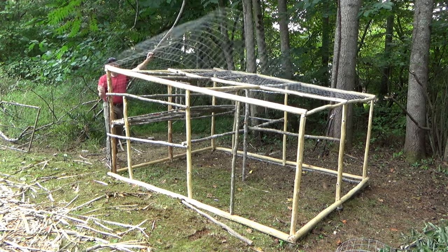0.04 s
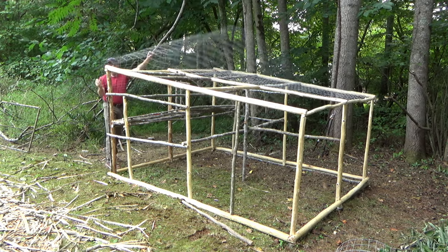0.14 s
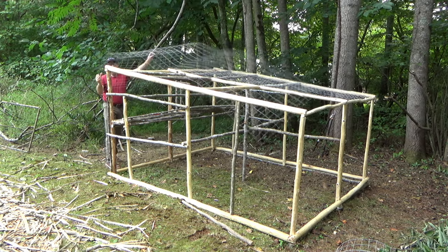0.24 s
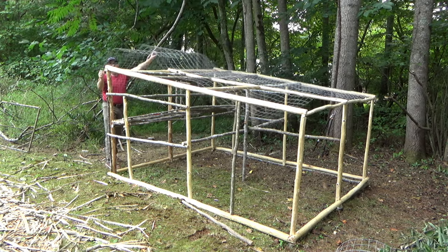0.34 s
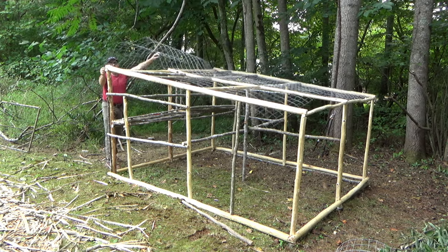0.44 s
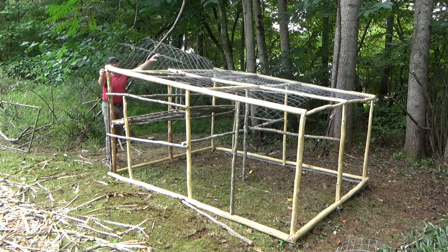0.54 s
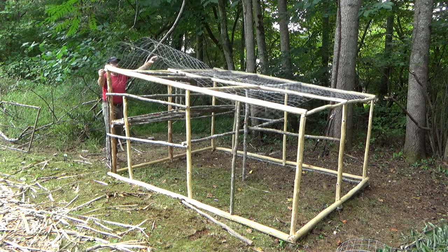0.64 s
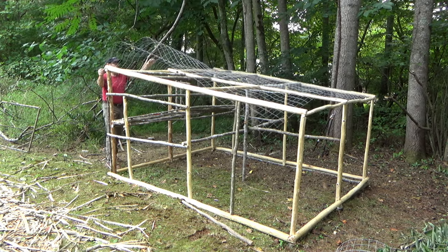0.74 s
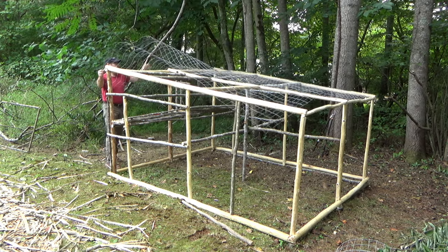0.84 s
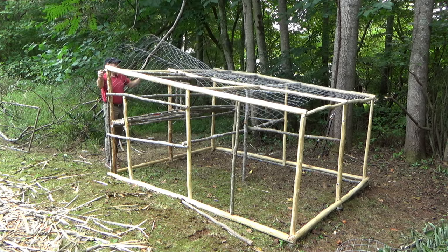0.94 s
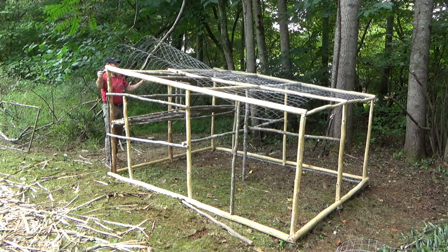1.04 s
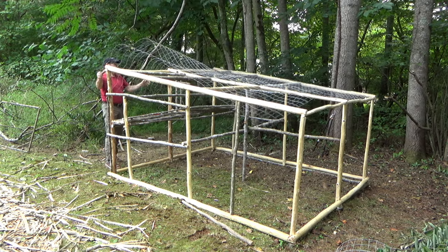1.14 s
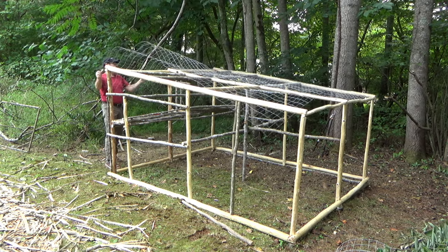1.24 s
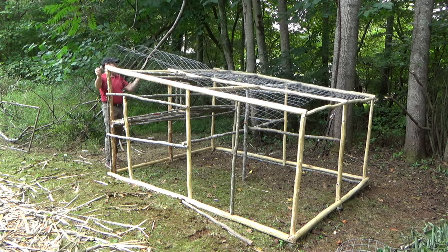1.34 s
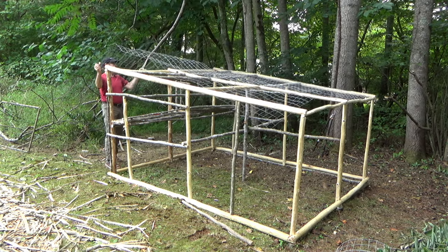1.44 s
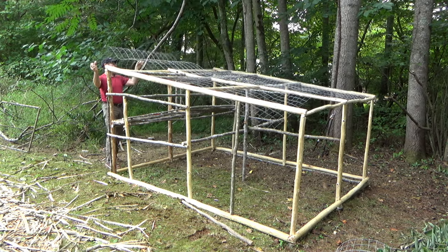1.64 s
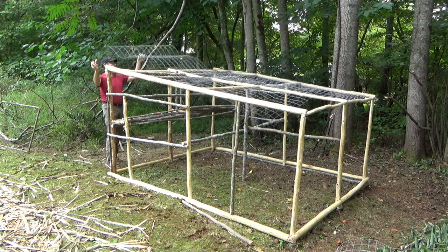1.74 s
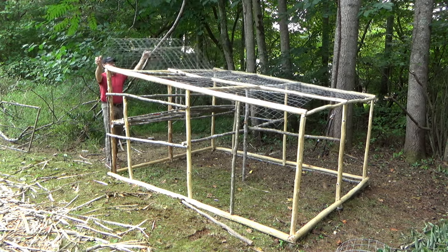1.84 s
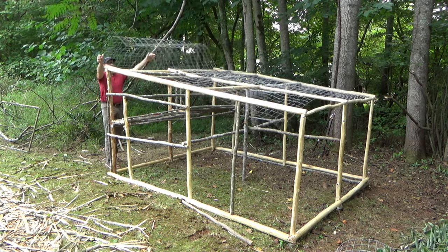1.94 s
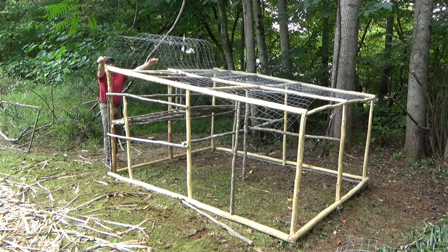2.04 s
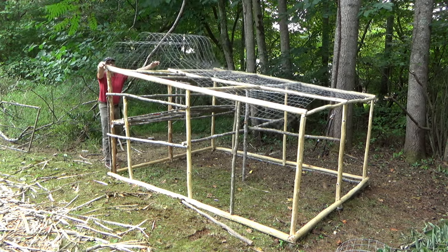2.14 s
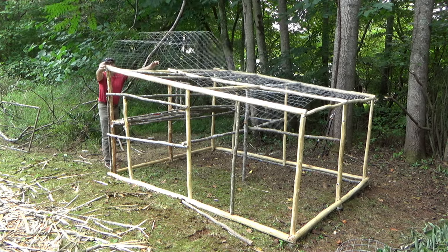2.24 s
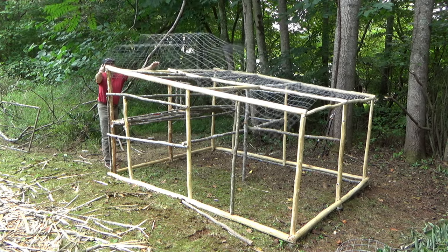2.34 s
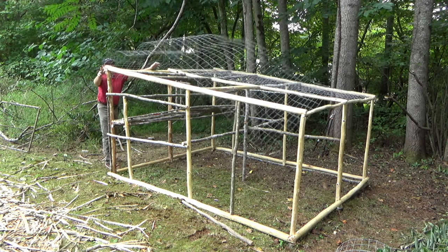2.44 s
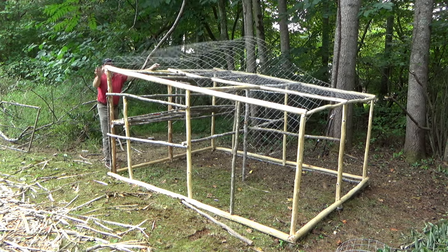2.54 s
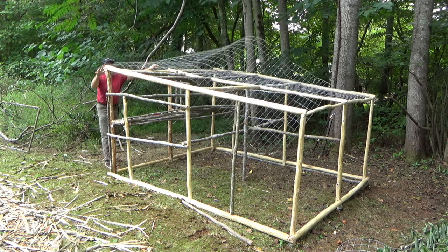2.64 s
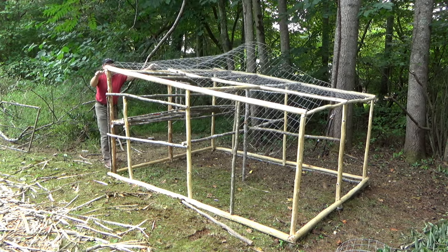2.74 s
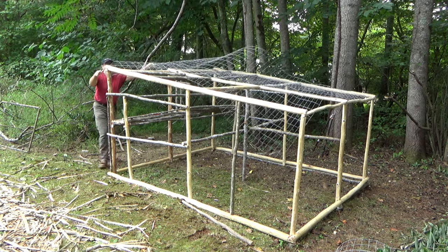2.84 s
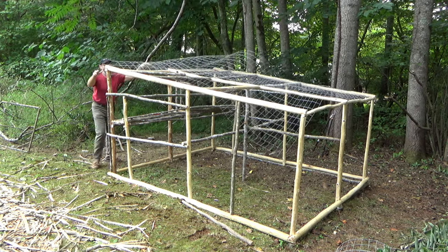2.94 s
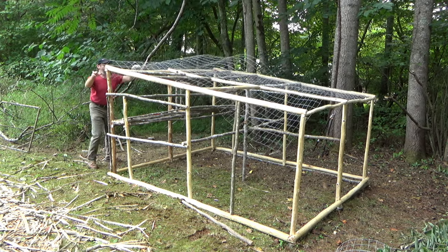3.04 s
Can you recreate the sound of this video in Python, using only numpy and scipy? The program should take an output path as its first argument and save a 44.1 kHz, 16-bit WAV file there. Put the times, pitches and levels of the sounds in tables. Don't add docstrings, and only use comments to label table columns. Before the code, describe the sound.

Wire mesh shaken over a wooden pole frame: a loud jangling burst at the start, fading to light rattles and small clinks, some metres from a stereo microphone in woods with insects and soft leaves.

```python
import sys
import numpy as np
from scipy import signal
from scipy.fft import rfft, irfft, next_fast_len
from scipy.io import wavfile

SR = 44100
rng = np.random.default_rng(int(sys.argv[2]) if len(sys.argv) > 2 else 0)


def rack_gain(trim_db):
    fader = np.asarray(trim_db, float)
    return 10 ** (fader / 20)


def digitize_waveform(pressure):
    field = np.atleast_2d(pressure).T
    bounded = np.clip(field, -1, 1)
    quanta = np.round(bounded * 32767).astype(np.int16)
    wavfile.write(sys.argv[1], SR, quanta)


N = 134505

# (time [s], tick level [dB], pole level against ticks [dB], hold [s])
JOLTS = [(0.2204, -19.5, -3.5, 0.019), (0.2404, -15, -1, 0.04), (0.3127, -15.5, -7, 0.0082),
         (0.382, -14, -3.5, 0.024), (0.4393, -12, -7.5, 0.031), (0.595, -23.5, -2, 0.0038),
         (0.698, -22.5, 3.5, 0.01), (0.7165, -14.5, -0.5, 0.013), (0.7816, -20.5, 1, 0.0072),
         (1.021, -27, -1, 0.013), (1.102, -23, -7.5, 0.011), (1.156, -22.5, -13, .01), (1.303, -32, 3, .01),
         (1.407, -27.5, -21, .01), (1.464, -32.5, -8, 0.009), (1.605, -26.5, -6.5, 0.034),
         (1.815, -25.5, -14, 0.025), (1.928, -27, -13, 0.038), (2.018, -26, -26, 0.0045),
         (2.043, -25, -4, 0.028), (2.076, -32, 0, .003), (2.097, -29.5, -4.5, 0.009),
         (2.168, -32, -4, 0.0096), (2.212, -39, -14, .004), (2.2584, -32, -11, .005),
         (2.263, -24.5, -20, 0.014), (2.337, -29, -0.5, 0.04), (2.394, -24.5, -3, 0.02),
         (2.408, -22, -0.5, .008), (2.4183, -18.5, -2, 0.0072), (2.448, -28, 0, .006),
         (2.596, -31.5, -3, 0.0076), (2.678, -28, -1.5, 0.016), (2.731, -28.5, -7, 0.013),
         (2.821, -37, -1, 0.0084), (3.036, -30, -8, .02)]
# (time [s], shaking level [dB], tick level against body [dB])
SHIVER = [(0, -38, -35), (.215, -50, -13), (.27, -29, -5), (.36, -26.5, -6.5), (.5, -23, -3.5),
          (.62, -26.5, -2.5), (.7, -27.5, -2), (.85, -29, -4), (1.05, -31.5, -5), (1.199, -34, -5),
          (1.35, -39.5, -4), (1.55, -39, -0.5), (2, -39, -1.5), (2.4, -34, -8), (2.53, -36.5, -10),
          (2.67, -38.5, -16), (2.74, -35.5, -6), (3.05, -40, -4)]
# (frequency [Hz], gain [dB])
TICK_COLOUR = [(700, -33), (2500, -2.5), (3700, -4.5), (5600, -3.5), (7500, -2), (10600, -5.5),
               (12500, -11), (15700, -12)]
# (frequency [Hz], gain [dB])
BODY_COLOUR = [(150, -34.5), (300, -19.5), (870, -5), (1700, -1.5), (2700, -3.5), (3600, -7.5),
               (8000, -12.5), (13000, -38)]
# (frequency [Hz], gain [dB])
GENTLE_COLOUR = [(3000, -2.5), (9000, -2.5), (11000, -1), (12500, -3), (15500, -2.5)]
# (frequency [Hz], level [dB])
PANEL_TONES = [(888, 0), (1093, 0), (1491, 0), (1723, 0), (2304, 1), (2835, 0), (3250, -1), (3422, -2),
               (4124, 0), (5557, -1), (6314, -1), (7036, -3), (8755, -2), (9037, -1)]
# (time [s], frequency [Hz], level [dB], length [s])
TWANGS = [(0.049, 2140, -41, .012), (0.226, 5530, -28, .005), (0.228, 5630, -28, 0.0048),
          (0.245, 3283, -23, 0.02), (0.253, 2120, -25, .012), (.282, 2840, -24, 0.026),
          (0.331, 2700, -31.5, .025), (0.243, 5680, -25, 0.022), (.243, 9080, -24, .011),
          (0.267, 2490, -23, .014), (.266, 9150, -32, .008), (.3155, 5520, -19.5, 0.0066),
          (0.322, 5530, -31, .003), (0.388, 6960, -30, 0.0092), (0.458, 2730, -28, 0.013),
          (0.464, 6860, -29, 0.028), (0.592, 2760, -26, 0.0066), (0.712, 4310, -26, 0.014),
          (.72, 1580, -22, 0.013), (.725, 6100, -31, 0.015), (1.605, 1340, -39, 0.042),
          (2.17, 3700, -37, .005), (2.061, 1970, -41, 0.012), (2.077, 1790, -45, .008),
          (2.345, 1240, -38.5, 0.033), (2.388, 3030, -33, 0.019), (2.409, 1344, -35, .025),
          (2.41, 2300, -38, 0.025), (2.641, 2250, -35.5, 0.01), (2.642, 906, -34.5, .012),
          (2.643, 1496, -43, 0.016), (2.748, 1310, -42, 0.011)]
# (time [s], frequency [Hz], level [dB])
THUMPS = [
    (3.005, 194, -43),
    (2.06, 180, -53),
    (2.645, 620, -49),
]
# (frequency [Hz],
# gain [dB])
ECHO_COLOUR = [(200, -11), (4000, -4), (9000, -12), (15000, 8)]
# (frequency [Hz], gain [dB])
WASH_COLOUR = [(30, -22), (120, -14), (300, -8.5), (750, -0.5), (1900, -3.5), (3500, -13.5), (8000, -0.5),
               (10500, -18), (15000, -42)]
# (frequency [Hz], width [Hz], level [dB])
INSECTS = [(6170, 1050, 5), (5670, 770, -3.5), (4545, 700, -1), (7130, 1100, -13.5)]
# (time [s], half length [s], level [dB])
GUSTS = [
    (.55, 0.78, -66),
    (2.05, .06, -64),
    (2.79, .03, -56),
    (2.875, 0.05, -55),
    (2.95, .02, -59),
]
# (frequency [Hz], gain [dB])
LEAN_RIGHT = [(60, -50), (1700, -42), (2100, -24), (3300, -17), (6500, -19), (9000, -24), (11000, -30),
              (12000, -60)]
# (frequency [Hz], gain [dB])
SIDE_COLOUR = [(40, -4), (150, 0.5), (500, -2.5), (1100, -8), (1800, -9), (2200, -2), (9000, 2.5),
               (11000, 4.5), (13000, -28)]
# (frequency [Hz], gain [dB])
MIC_COLOUR = [(25, -2.5), (3300, 0), (3700, 0.5), (4900, 0), (5600, 0.5), (9700, 0), (10600, 3.5),
              (11600, -0.5)]


def evened(x):
    return x / np.sqrt(np.mean(x ** 2) + 1e-20)


def colour(x, points):
    size = next_fast_len(x.shape[-1] + 2048)
    hz, db = np.transpose(points)
    log_hz = np.log(np.fft.rfftfreq(size, 1 / SR) + 1)
    gain = rack_gain(np.interp(log_hz, np.log(hz), db))
    return irfft(rfft(x, size) * gain, size)[..., :x.shape[-1]]


def add(mix, start_s, sound):
    part = mix[round(start_s * SR):][:len(sound)]
    part += sound[:len(part)]


def resonate(x, hz, width_hz):
    turn = np.exp(2j * np.pi * hz * np.arange(x.shape[-1]) / SR)
    r = np.exp(-np.pi * width_hz / SR)
    return 2 * (turn * signal.lfilter([1 - r], [1, -r], x / turn)).real


def drift(rate_hz):
    feedback = [1, -2 * np.exp(-6.3 * rate_hz / SR), np.exp(-12.6 * rate_hz / SR)]
    return evened(signal.lfilter([1], feedback, rng.standard_normal(N)))


def ticks(size):
    ticks_per_s, size_db = 5000, 3
    chance, sign, strength = rng.random((size, 3)).T
    hits = (chance < ticks_per_s / SR) * np.sign(sign - 0.5)
    return evened(hits * rack_gain(-size_db * np.log(strength + 0.034)))


def patch():
    stray_t60, stray_db = 0.074, 0.5
    panel_t60, panel_db = 0.088, -11.5
    t = np.arange(5000)[:, None] / SR
    pitch, fade, strength = rng.random((160, 3)).T
    stray_hz = 400 + 14000 * pitch ** 1.3
    stray_level = rack_gain(-60 * t / (stray_t60 * (0.46 + fade)) + 0.7 * strength)
    stray = (np.sin(2 * np.pi * stray_hz * t + 1) * stray_level).sum(1)
    hz, db = np.transpose(PANEL_TONES)
    panel = (np.sin(2 * np.pi * hz * t) * rack_gain(db - 60 * t / panel_t60)).sum(1)
    ring = rack_gain(stray_db) * stray / np.linalg.norm(stray)
    ring += rack_gain(panel_db) * panel / np.linalg.norm(panel)
    ring[0] += 1
    return ring / np.linalg.norm(ring)


def jolts():
    tick_rise_s, pole_rise_s = 0.0053, 0.0027
    tick_t60, pole_t60, all_db = 0.17, 0.48, -8
    bright, body = np.zeros(N), np.zeros(N)
    t = np.arange(SR // 2) / SR
    for s, db, pole_db, hold in JOLTS:
        after = np.maximum(t - pole_rise_s - hold, 0)
        ring = patch()
        tick_level = np.minimum(t / tick_rise_s, 1) * rack_gain(db - 60 * after / tick_t60)
        pole_level = np.minimum(t / pole_rise_s, 1) * rack_gain(db + pole_db - 60 * after / pole_t60)
        add(bright, s - 0.003, signal.fftconvolve(ticks(len(t)) * tick_level, ring))
        add(body, s - 0.004, signal.fftconvolve(ticks(len(t)) * pole_level, ring))
    return rack_gain(all_db) * bright, rack_gain(all_db) * body


def shiver():
    t = np.arange(N) / SR
    s, db, tick_db = np.transpose(SHIVER)
    level = rack_gain(np.interp(t, s, db) + 0.4 * drift(19))
    both = np.zeros((2, N))
    for k in range(3):
        share = np.cos(np.pi * (2 * t + k / 3))
        contacts = np.array([ticks(N), ticks(N)]) * level * share
        both += signal.fftconvolve(contacts, patch()[None])[:, :N]
    return both[0] * rack_gain(np.interp(t, s, tick_db)), both[1]


def twangs():
    width_hz, roughness = 420, 0.9
    out = np.zeros(N)
    t = np.arange(3000) / SR
    for s, hz, db, length in TWANGS:
        gate = np.minimum(t / 0.0017, 1) * rack_gain(-2500 * np.maximum(t - length, 0))
        tone = np.sqrt(2) * np.sin(2 * np.pi * hz * t)
        rattle = resonate(resonate(ticks(len(t)), hz, width_hz), hz, 2 * width_hz)
        add(out, s, rack_gain(db - 3) * gate * (tone + roughness * evened(rattle)))
    return out


def thumps():
    out = np.zeros(N)
    for s, hz, db in THUMPS:
        turns = np.arange(1500) * hz / SR
        swell = np.sin(np.pi * np.minimum(turns / 2.2, 1)) ** 2
        add(out, s, -rack_gain(db) * 2 * swell * np.sin(2 * np.pi * turns))
    return out


def echoes(x, t60):
    t = np.arange(SR // 2) / SR
    sign = rng.choice([-1., 1.], (2, len(t)))
    present = rng.random((2, len(t))) < 0.05
    taps = sign * present * (t > t60 / 35) * rack_gain(-60 * t / t60)
    return signal.fftconvolve(x[None], taps / np.linalg.norm(taps[0]), axes=1)[:, :N]


def leaf_wash():
    noise = rng.standard_normal((2, N))
    return evened(colour(noise, WASH_COLOUR)) * rack_gain(-43.5 + 0.84 * drift(3.4))


def insects():
    throb_hz, throb_db = 58, 0.4
    noise = rng.standard_normal((2, N))
    turns = np.cumsum(throb_hz * (1 + 0.1 * drift(8))) / SR
    buzz = np.zeros((2, N))
    for hz, width, db in INSECTS:
        buzz += rack_gain(db) * resonate(resonate(noise, hz, width), hz, width) / np.sqrt(width)
    throb = throb_db * np.sin(2 * np.pi * turns)
    return evened(buzz) * rack_gain(-40.5 + throb + 1.7 * drift(1.4))


def gusts():
    t = np.arange(N) / SR
    low = evened(colour(rng.standard_normal(N), [(30, -19), (100, 0.5), (160, 3.0), (300, -28)]))
    puffs = sum(rack_gain(db) * np.exp(-((t - s) / half) ** 2) for s, half, db in GUSTS)
    return low * rack_gain(3.2 * drift(13)) * puffs


def scene():
    jolt_ticks, jolt_body = jolts()
    shiver_ticks, shiver_body = shiver()
    bright = colour(jolt_ticks + colour(shiver_ticks, GENTLE_COLOUR), TICK_COLOUR)
    body = colour(jolt_body + shiver_body, BODY_COLOUR)
    mesh = rack_gain(6) * bright + rack_gain(6.5) * body + twangs() + thumps()

    tree_echo = colour(echoes(mesh, 0.24), ECHO_COLOUR)
    pole_echo = echoes(mesh, 0.05)[0]
    woods = leaf_wash() + insects()
    air = gusts()

    mid = mesh + rack_gain(-12) * tree_echo[0] + woods[0] + air
    spread = rack_gain(-19.5) * tree_echo[1] + rack_gain(-17.5) * pole_echo + rack_gain(-11.5) * woods[1]
    side = colour(spread, SIDE_COLOUR) - colour(mid, LEAN_RIGHT)
    side += rack_gain(-14) * np.roll(air, 90)
    return np.array([mid + side, mid - side])


def roll_off(x):
    return signal.sosfilt(signal.butter(12, 15850, fs=SR, output="sos"), x)


def record(dry):
    knee = 0.8
    mix = knee * np.tanh(colour(dry, MIC_COLOUR) / knee)
    return roll_off(mix)


dry = scene()
out = record(dry)
digitize_waveform(out)
```